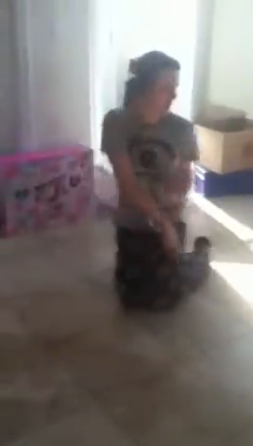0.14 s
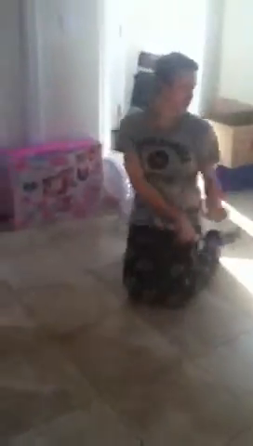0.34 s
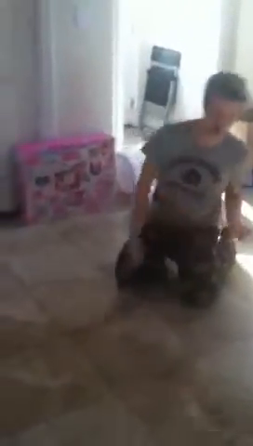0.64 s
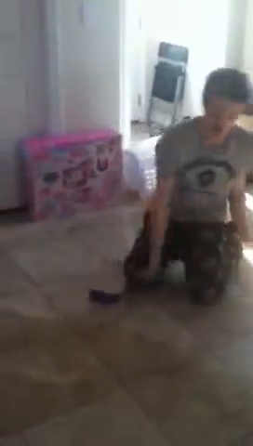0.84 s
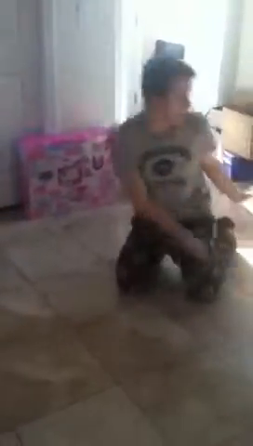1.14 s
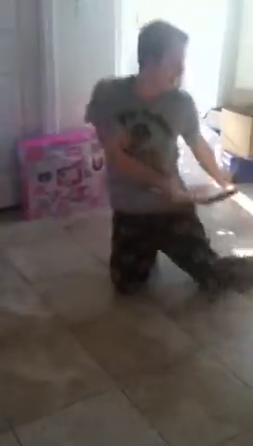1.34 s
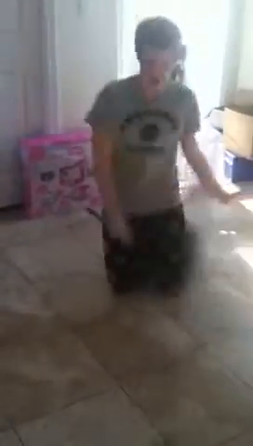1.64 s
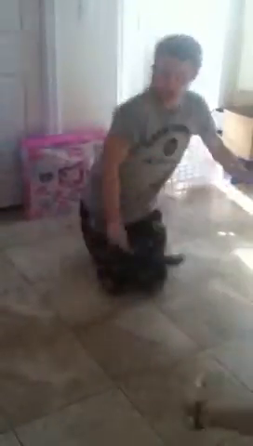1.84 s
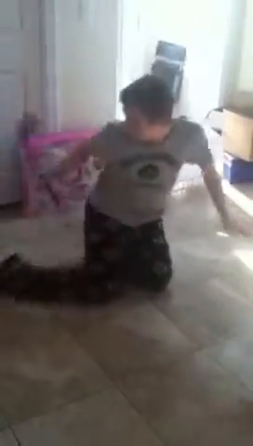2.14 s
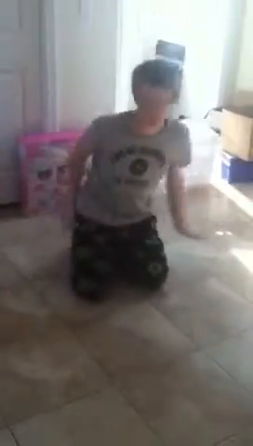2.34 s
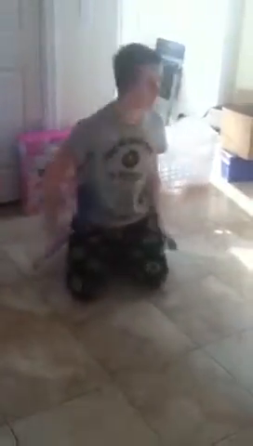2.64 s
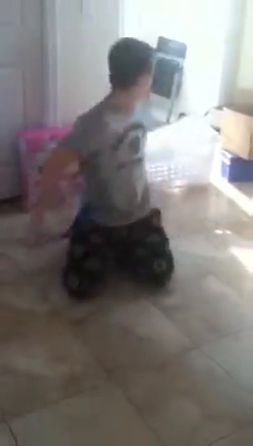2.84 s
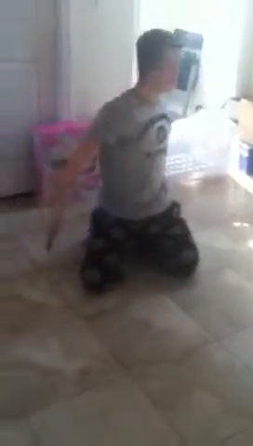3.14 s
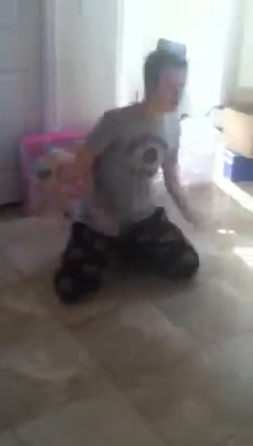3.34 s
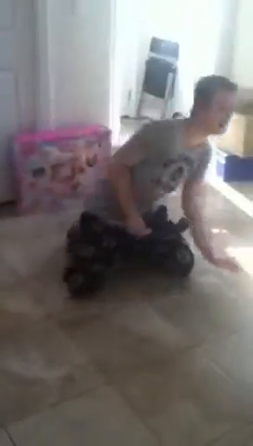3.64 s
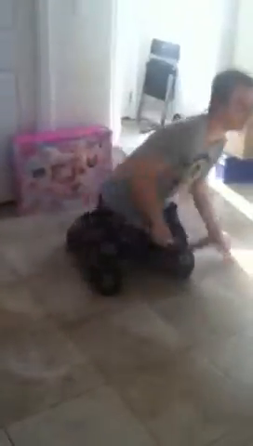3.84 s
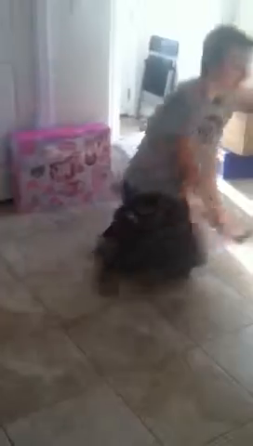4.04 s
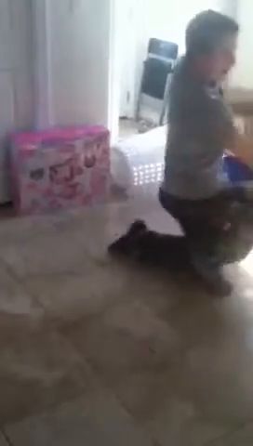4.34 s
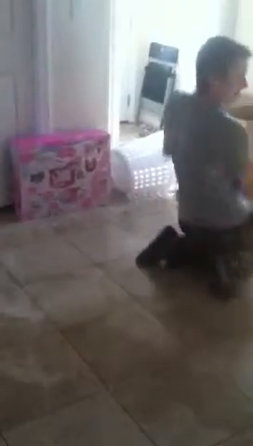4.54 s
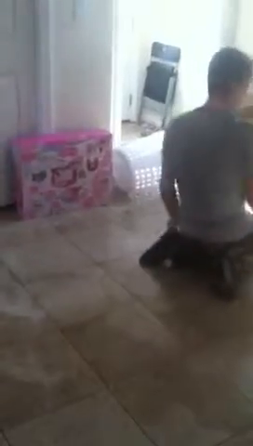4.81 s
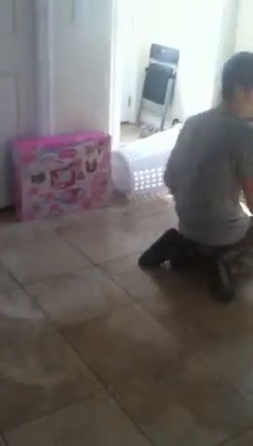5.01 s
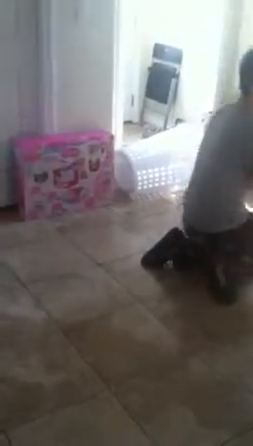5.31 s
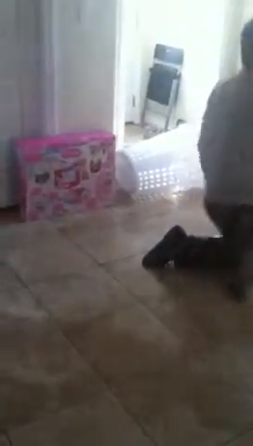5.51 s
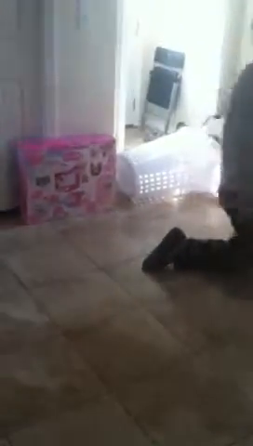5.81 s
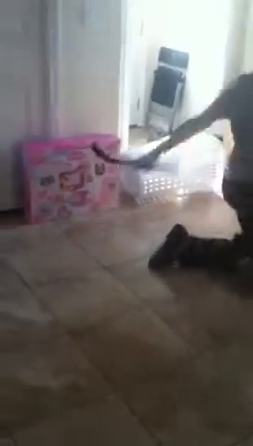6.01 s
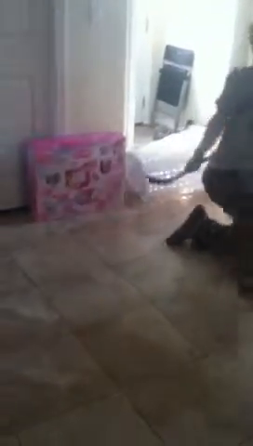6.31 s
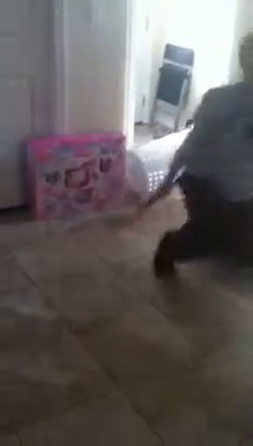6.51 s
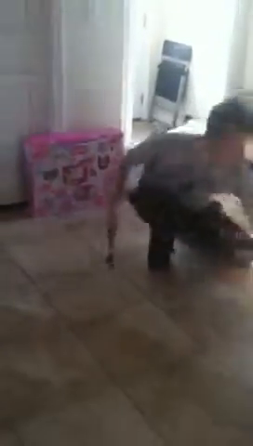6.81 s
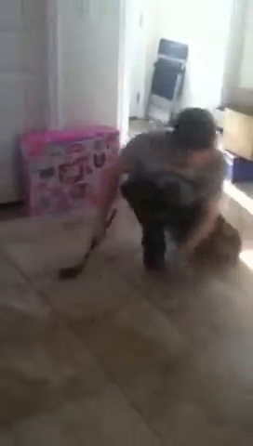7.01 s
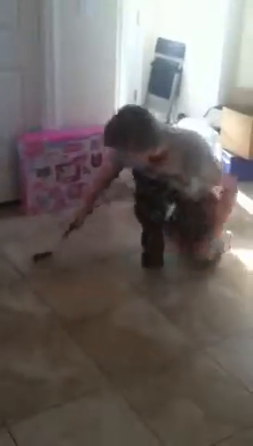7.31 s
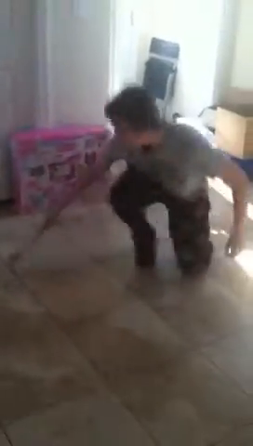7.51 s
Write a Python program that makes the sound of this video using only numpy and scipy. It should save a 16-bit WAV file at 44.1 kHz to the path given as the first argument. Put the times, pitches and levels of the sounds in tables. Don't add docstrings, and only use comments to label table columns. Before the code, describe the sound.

Irregular plastic clacks, flat slaps and hollow bonks on a tiled floor, with duller knee and ball thumps and light cloth scuffing. The opening is busy and loudest around two seconds; the middle thins out, then scattered blows return, including a hollow basket hit after six seconds. Heard by a small phone across a reverberant room, thin in bass and treble, over faint steady house hum.

```python
import sys
import numpy as np
from scipy import signal
from scipy.io import wavfile
from scipy.ndimage import uniform_filter1d

SR = 44100
rng = np.random.default_rng(int(sys.argv[2]) if len(sys.argv) > 2 else 0)


def wav_out(sig):
    wavfile.write(sys.argv[1], SR, np.round(np.clip(np.atleast_2d(sig).T, -1, 1) * 32767).astype(np.int16))


def how_loud(loudness_db):
    steps = np.asarray(loudness_db, float) / 20
    return 10 ** steps


N = 337806
CIRCLE_HZ = abs(np.fft.fftfreq(4096, 1 / SR))
PLACES = 9

# frequency in Hz, density in dB per Hz.
HOUSE_HUM = [(15, -47.5), (30, -28), (80, -44.5), (139, -2), (210, 4.5), (327, 1.5), (472, -6.5),
             (1170, -11), (3800, -16.5), (4800, -22), (8680, -35.5), (13000, -42.5), (15500, -55),
             (17000, -93.5)]
HOUSE_DB = -61

# frequency in Hz, gain in dB.
MICROPHONE = [(20, -50), (100, -17.5), (200, 1), (400, -0.83), (1500, 0.5), (2400, 4), (3100, 3.5),
              (3800, 5.5), (4600, 0.5), (7000, -4.5), (10000, -17.5), (13000, -22), (16000, -37)]

# frequency in Hz, t60 in s.
ROOM_DECAY = [(100, .5), (330, 0.52), (870, 0.47), (2300, 0.45), (5000, 0.43), (9000, 0.32), (12000, 0.19),
              (15000, 0.074)]
HALL_DB, HALL_LONGER = -25.5, 1.8

# frequency in Hz, density in dB per Hz.
SCUFF_COLOUR = [(88, -45), (150, -10.5), (267, 0.5), (624, -2), (1000, -0.5), (1350, -3), (1600, 3.5),
                (1900, -3), (2500, -4.5), (3800, -8), (4800, -17.5), (8680, -31.5), (12000, -47),
                (16000, -53)]
# fastest moment in s, level in dB, speeding up in s, slowing down in s.
SLIDES_ON_TILE = [(.285, -51, 0.028, 0.044), (.36, -49.5, 0.084, 0.31), (.44, -45, 0.035, 0.19),
                  (.75, -58.5, .3, 0.043), (1.71, -55.5, .02, .15), (1.856, -51.5, .15, .01),
                  (2.32, -62, .05, 0.39), (2.44, -59, 0.033, 0.19), (3.55, -62.5, 0.065, .02),
                  (3.815, -61.5, 0.12, .02), (4.29, -55.5, 0.24, 0.42), (4.385, -45.5, 0.029, 0.18),
                  (4.494, -45, .05, .02), (5.51, -62, .02, 0.27), (6.57, -58.5, 0.34, 0.23),
                  (6.67, -57.5, .02, .3), (6.915, -60.5, .08, 0.28), (7.3, -61.5, 0.087, 0.089),
                  (7.54, -49.5, .03, .15), (7.62, -56, .05, 0.11)]
SLIDE_RANGE_DB = 21

SQUEAK_S, SQUEAK_LENGTH_S, SQUEAK_HZ, SQUEAK_DB, SQUEAK_FADE_DB = 1.412, .135, 3300, -35.5, -11.5
SLIPS_PER_S, SLIP_SPREAD, SLIP_FLOOR = 78, .3, .12

TICK_DB, TICK_S, TICK_HZ = -44, .0012, 9000

# start in seconds, peak in dB, pitch in Hz, room in dB.
SHAFT_RINGS = [(.003, -40, 5400, 22), (.003, -21.5, 3240, -1), (.798, -22, 2330, -1),
               (.798, -20.5, 2850, 2.5), (.856, -22, 1735, 6), (.856, -21.5, 3730, -15),
               (1.075, -29.5, 2580, 8), (1.249, -15.5, 1886, -2.5), (1.249, -30.5, 3540, 2),
               (1.555, -21.5, 3150, -17.5), (1.87, -18.5, 4273, 0.5), (2.007, -12.5, 3550, -7),
               (5.07, -17.5, 4020, -9), (5.89, -24, 2550, -2), (2.88, -40, 2560, 4)]
# start in seconds, peak in dB, pitch in Hz, room in dB.
BLADE_NOTES = [(.003, -16, 2340, 7.5), (.003, -27.5, 1500, 3.5), (.95, -16.5, 2530, 1.2),
               (1.869, -9, 2190, -6.5), (2.007, -13, 2320, 7), (.417, -35, 3400, 0),
               (2.123, -30.5, 467, 11.5), (2.381, -44, 6000, -15.5), (2.636, -31, 3570, 10),
               (2.881, -29, 3360, 6.5), (2.881, -26.5, 786, 6.5), (4.3, -36.5, 250, 1.5),
               (4.385, -29.5, 2200, 1), (4.513, -24, 850, 7.5), (4.621, -26.5, 2900, -3.5),
               (5.068, -24.5, 5500, 2), (5.7, -27.5, 1157, 9.5), (5.7, -24, 763, 2),
               (6.25, -35.5, 2920, 6.5), (6.566, -44, 1096, 1), (6.997, -42, 3300, -5.5),
               (7.362, -30, 1194, -8)]
SHAFT_WIDTH, BLADE_WIDTH = 0.076, 0.23
# frequency in Hz, level in dB, ring width as a share of Hz.
BASKET_RINGS = [(330, -10.5, .06), (493, -0.5, 0.081), (620, -5, 0.078), (840, -3.5, 0.088),
                (1040, -12.5, 0.086)]
# frequency in Hz, level in dB, ring width as a share of Hz.
BOX_RINGS = [(225, -14, .13), (346, -1.5, 0.024)]
# start in seconds, peak in dB, room in dB.
BASKET_HIT = (6.252, -21.5, 0)
# start in seconds, peak in dB, room in dB.
BOX_HIT = (0.00307, -26.5, -9)

# multiple of the main ring, level in dB.
BLADE_MODES = [(1.01, 1.2), (1.45, -10.5), (.7, -3.5), (2.1, -13)]
# multiple of the main ring, level in dB.
SHELL_MODES = [(1.01, 2), (1.6, -8), (.6, -6), (2.3, -21.5)]
# start in seconds, peak in dB, main ring in Hz, push over the ring in dB, room in dB.
DULL_THUMPS = [(1.076, -17.5, 970, -4, 1.5), (1.555, -30.5, 890, -10, 7), (1.868, -29, 1050, -3, 19.5),
               (2.12, -22, 766, -4, 5), (2.22, -36, 241, -5, 6), (2.634, -27.5, 805, -23, 10.5),
               (2.881, -15, 274, -0.5, 0.5), (3.21, -29, 696, -8, -0.5), (3.528, -45, 218.6, -4.5, -3.5),
               (4.273, -45.5, 215, -10, 12.5), (4.384, -26, 1120, -7.5, 2.5), (4.511, -17, 823, -25, 3),
               (5.697, -19, 655, -6, 3.5), (5.89, -13.5, 720, -6, 5), (7.361, -19.5, 1210, -4.5, 7.5)]
# start in seconds, peak in dB, main ring in Hz, push over the ring in dB, room in dB.
HOLLOW_BONKS = [(0.002, -19.5, 300, 1, 5), (0.423, -44, 807, -20, 1), (0.797, -37.5, 403, -18, 7.5),
                (0.856, -27, 1230, -20, 6.5), (1.246, -22.5, 889, -1, 3.5), (1.44, -32.5, 824, 7, 9.5),
                (2.007, -31, 1060, -26, -6), (3.603, -53, 379, -23, 1), (4.619, -26, 898, 0.5, 1.5),
                (5.065, -43, 1100, -18, 1), (5.312, -34.5, 805, 7, 8), (6.674, -39.5, 330, -7, 3),
                (6.25, -22.5, 640, -14, 2.5), (6.262, -25, 260, -8, 1), (4.524, -23, 780, -12, -3.5),
                (.075, -36, 280, -12, 0), (.13, -32.5, 225, -13.5, 0.5), (6.913, -46.5, 232, -4, 4),
                (7.103, -49.5, 220.5, -9, 10.5)]
# start in seconds, peak in dB, main ring in Hz, crack over the ring in dB, room in dB.
EDGE_TAPS = [(0.416, -30, 2450, -17, 0.5), (0.799, -5.5, 2870, 12, 3.5), (1.074, -15.5, 2540, -19.5, 0.5),
             (1.8691, -1.5, 2220, -16.5, -1.5), (2.0066, -1.2, 2590, 0, 2), (2.0144, -3, 2300, -9.5, -7.5),
             (2.3814, -44, 4500, 3, -10), (2.6357, -19, 1380, -7, 7.5), (2.8788, -27.5, 1240, 5, 9),
             (3.2103, -29.5, 2580, -14, 0), (4.3831, -28, 2204, -32.5, 7), (4.4925, -28, 1870, -22, 7.5),
             (4.621, -24, 1530, -12, -1.5), (4.9467, -41, 1340, -20.5, -5),
             (5.0604, -33.5, 3800, -17.5, 19), (5.6993, -11, 1270, -11.5, 5.5),
             (6.52, -51.5, 2920, -8.5, 20.5), (6.567, -40, 1580, -33, 1), (6.669, -33.5, 2620, -7, 1),
             (6.9127, -43, 1400, -10, 3.5), (6.996, -41, 2680, -13, 4), (7.3609, -17.5, 3080, -33.5, 3)]
# start in seconds, peak in dB, main ring in Hz, crack over the ring in dB, room in dB.
FLAT_SLAPS = [(0.0024, -10, 3000, 15, 1.5), (0.8547, -6.5, 2740, -10, 1.5),
              (0.9511, -15.5, 2360, -22, -1.5), (1.2471, -13.5, 1960, -15, 7),
              (1.5561, -14.5, 1910, -20.5, -0.5), (4.5124, -29, 2200, -4.5, 16.5),
              (5.0671, -12, 3620, -17.5, 4.5), (5.312, -32.5, 2120, -11, -0.5), (5.891, -15, 2840, -6, 4.5),
              (6.2471, -23.5, 2850, -25.5, -7), (1.44, -35.5, 3000, -5, 4.5)]
SLAP_WIDTH, TAP_WIDTH, THUMP_WIDTH, BONK_WIDTH = 1, 0.44, 0.7, .26


def evened(x):
    return x / np.sqrt(np.mean(x ** 2) + 1e-20)


def read(points, hz):
    f, value = np.transpose(points)
    return np.interp(np.log(hz + 1), np.log(f + 1), value)


def add(mix, s, sound):
    part = mix[max(round(s * SR), 0):][:len(sound)]
    part += sound[:len(part)]


def causal(gain):
    log_gain = np.log(gain + 1e-5)
    spectrum = np.exp(log_gain - 1j * signal.hilbert(log_gain).imag)
    return np.fft.ifft(spectrum).real[:2048]


def hiss(colour, patchy_db):
    real, imag, patches = rng.standard_normal((N // 256 + 5, 513, 3)).T
    patches = uniform_filter1d(patches, size=10, axis=0)
    patches = evened(uniform_filter1d(patches, size=12, axis=1))
    colour_db = read(colour, np.fft.rfftfreq(1024, 1 / SR))[:, None]
    z = (real + 1j * imag) * how_loud(colour_db + patchy_db * patches)
    return evened(signal.istft(z, nperseg=1024, noverlap=768)[1][:N])


def house():
    return how_loud(HOUSE_DB) * hiss(HOUSE_HUM, patchy_db=.6)


def room_tails(gap_s, build_s, early_db, early_s, uneven_db):
    hz, t, z = signal.stft(rng.standard_normal((PLACES, SR)), SR, nperseg=256)
    uneven = uniform_filter1d(rng.standard_normal(z.shape), size=3, axis=1)
    uneven = evened(uniform_filter1d(uneven, size=14, axis=2))
    fall_db = -60 * t / read(ROOM_DECAY, hz)[:, None]
    room_and_hall = how_loud(fall_db) + how_loud(HALL_DB + fall_db / HALL_LONGER)
    z = z * room_and_hall * how_loud(uneven_db * uneven)
    tails = signal.istft(z, SR, nperseg=256)[1][:, :SR]
    t = np.arange(SR) / SR
    sparse = rng.random(tails.shape) < 500 / SR
    tails = tails + np.sign(tails) * sparse * how_loud(early_db) * np.exp(-t / early_s)
    tails = tails * np.clip((t - gap_s) / build_s, 0, 1)
    return tails / np.linalg.norm(tails, axis=1, keepdims=True)


def microphone(sound):
    return signal.oaconvolve(sound, causal(how_loud(read(MICROPHONE, CIRCLE_HZ))))[:N]


def scuffs():
    t = np.arange(0, N, 100) / SR
    power = 0
    for s, db, up_s, down_s in SLIDES_ON_TILE:
        away = np.where(t < s, (s - t) / max(up_s, .005), (t - s) / max(down_s, .005))
        power = power + how_loud(2 * (db - SLIDE_RANGE_DB * away))
    level = uniform_filter1d(np.repeat(np.sqrt(power), 100)[:N], size=800)
    return level * hiss(SCUFF_COLOUR, patchy_db=1.2)


def squeak(waver_hz):
    t = np.arange(0, SQUEAK_LENGTH_S, 1 / SR)

    def drift():
        smooth = uniform_filter1d(rng.standard_normal(8000), size=300)
        return evened(uniform_filter1d(smooth, size=300))[:len(t)]

    waver, pace, grip = drift(), drift(), drift()
    tone = np.sqrt(2) * np.sin(2 * np.pi * np.cumsum(SQUEAK_HZ + waver_hz * waver) / SR)
    slip_phase = np.pi * np.cumsum(SLIPS_PER_S * (1 + SLIP_SPREAD * pace)) / SR
    slips = SLIP_FLOOR + abs(np.sin(slip_phase)) ** 1.5
    level_db = SQUEAK_DB + SQUEAK_FADE_DB * (t / SQUEAK_LENGTH_S) ** 2 + 1.5 * grip
    out = np.zeros(N)
    add(out, SQUEAK_S, tone * slips * how_loud(level_db) * signal.windows.tukey(len(t), .1))
    return out


def ticks():
    rows = sorted(FLAT_SLAPS + EDGE_TAPS)
    out = np.zeros(N)
    t = np.arange(400) / SR
    for s, db, *_ in rows:
        noise = rng.standard_normal(len(t))
        add(out, s, how_loud(db + TICK_DB) * noise * np.exp(-t / TICK_S))
    treble = signal.butter(4, [TICK_HZ, 14500], "bandpass", fs=SR, output="sos")
    return signal.sosfilt(treble, out)


def rings():
    notes = [(*row, SHAFT_WIDTH) for row in SHAFT_RINGS]
    notes += [(*row, BLADE_WIDTH) for row in BLADE_NOTES]
    for (s, db, room_db), modes in ((BASKET_HIT, BASKET_RINGS), (BOX_HIT, BOX_RINGS)):
        notes += [(s, db + mode_db, hz, room_db, width) for hz, mode_db, width in modes]
    out = np.zeros((1 + PLACES, N))
    t = np.arange(4096) / SR
    for k, (s, db, hz, room_db, width) in enumerate(notes):
        tone = how_loud(db) * np.sin(2 * np.pi * hz * t) * np.exp(-np.pi * width * hz * t)
        add(out[0], s, tone)
        add(out[1 + (k + 3) % PLACES], s, how_loud(room_db) * tone)
    return out


def chatter(x, delays, share):
    for delay in delays:
        loop = np.r_[1, np.zeros(delay - 1), -share]
        x = signal.lfilter(loop[::-1], loop, x)
    return x


def in_order(*kinds):
    return sorted((*row, width) for rows, width in kinds for row in rows)


def knocks(rows, modes, crack_hz):
    out = np.zeros((1 + PLACES, N))
    spread = 1 + 0.023 * rng.standard_normal((len(rows), len(modes)))
    delays = rng.integers(5, 45, (len(rows), 3))
    for k, (s, db, hz, crack_db, room_db, width) in enumerate(rows):
        power = how_loud(2 * crack_db) / (1 + (CIRCLE_HZ / crack_hz) ** 4)
        for (multiple, mode_db), shift in zip(modes, spread[k]):
            off = (CIRCLE_HZ / (hz * multiple * shift) - 1) / (max(width, .02) / 2)
            power = power + how_loud(2 * mode_db) / (1 + off ** 2) ** 2
        blow = causal(np.sqrt(power))
        blow = how_loud(db) * blow / abs(blow).max()
        add(out[0], s, chatter(blow, delays[k], share=0.48))
        add(out[1 + k % PLACES], s, how_loud(room_db) * blow)
    return out


def scene():
    tails = room_tails(gap_s=0.0014, build_s=0.0037, early_db=14.5, early_s=0.019, uneven_db=1.37)
    rub = squeak(waver_hz=19.0) + scuffs()
    rub = rub + how_loud(-7.0) * signal.fftconvolve(rub, tails[0])[:N]
    plastic = in_order((FLAT_SLAPS, SLAP_WIDTH), (EDGE_TAPS, TAP_WIDTH))
    dull = in_order((DULL_THUMPS, THUMP_WIDTH), (HOLLOW_BONKS, BONK_WIDTH))
    clacks = knocks(plastic, BLADE_MODES, crack_hz=8130.0)
    thuds = knocks(dull, SHELL_MODES, crack_hz=980.0)
    thuds = thuds[np.r_[0, PLACES:0:-1]]
    blows = clacks + thuds + rings()
    echoes = signal.fftconvolve(blows[1:], tails, axes=1)[:, :N].sum(0)
    return (microphone(blows[0] + echoes) + rub + house() + ticks())[None]


def top_cut(x):
    return signal.sosfilt(signal.butter(12, 15700, fs=SR, output="sos"), x)


def record(dry):
    return top_cut(dry)


dry = scene()
out = record(dry)
wav_out(out)
```